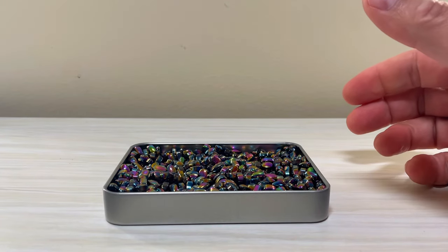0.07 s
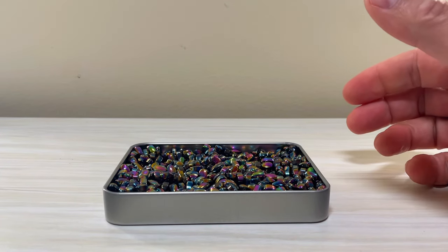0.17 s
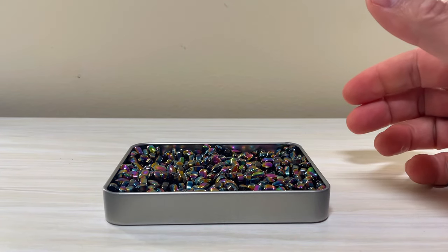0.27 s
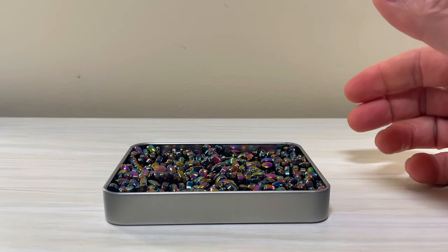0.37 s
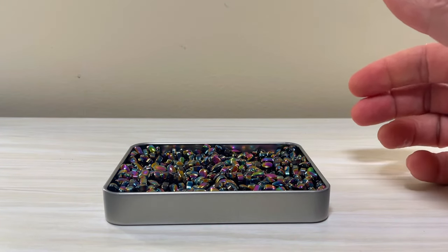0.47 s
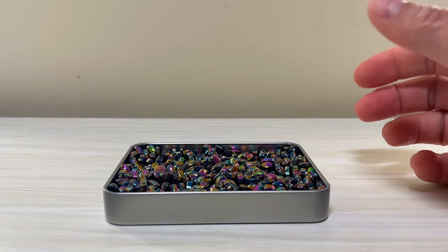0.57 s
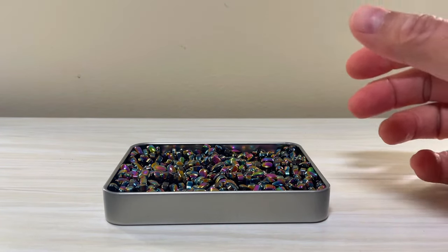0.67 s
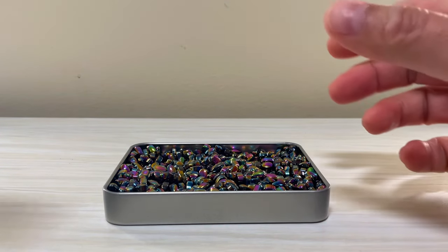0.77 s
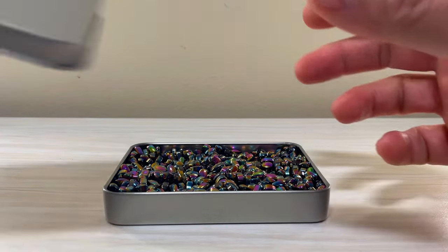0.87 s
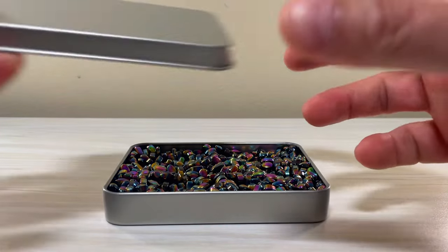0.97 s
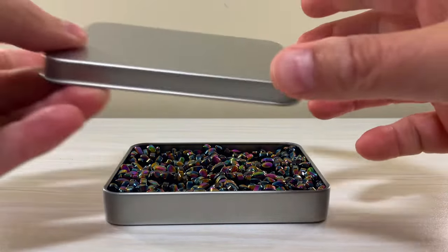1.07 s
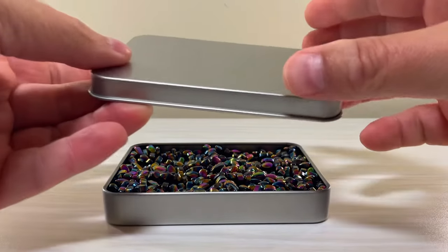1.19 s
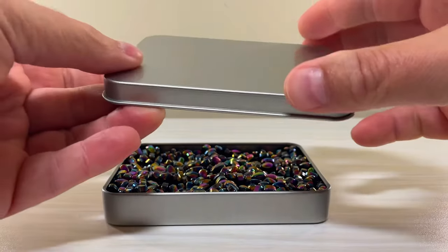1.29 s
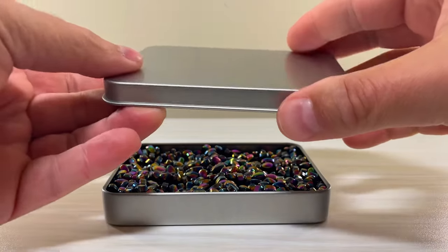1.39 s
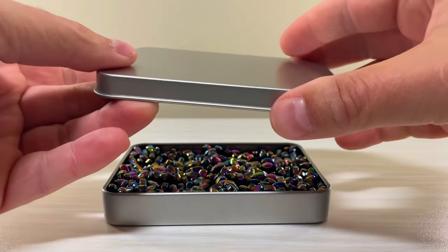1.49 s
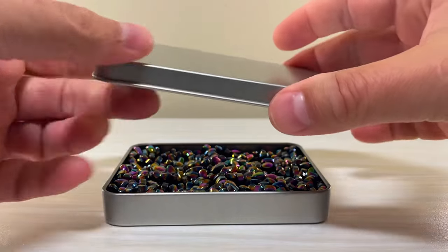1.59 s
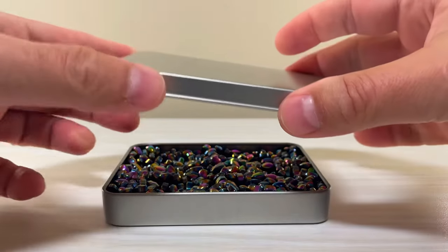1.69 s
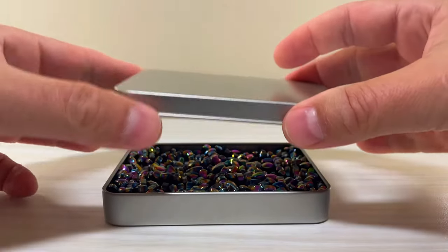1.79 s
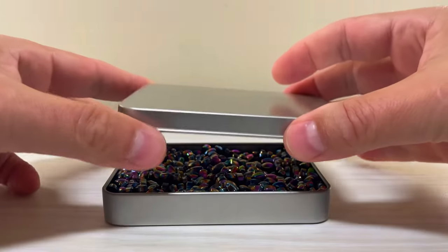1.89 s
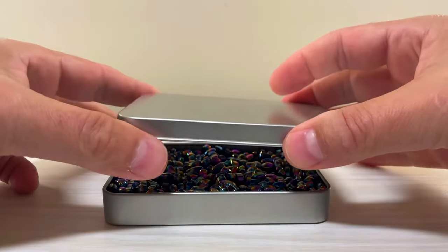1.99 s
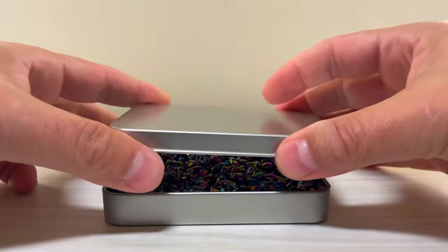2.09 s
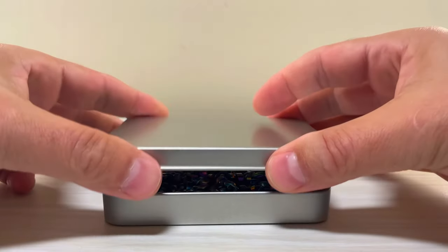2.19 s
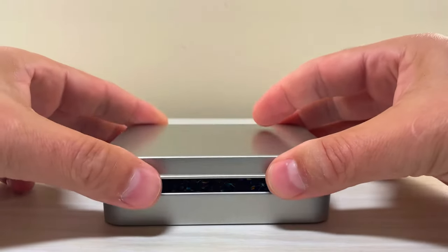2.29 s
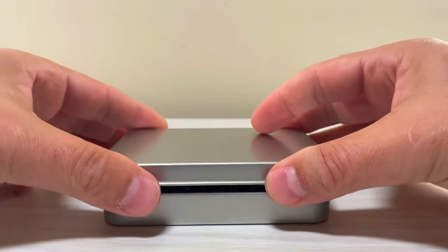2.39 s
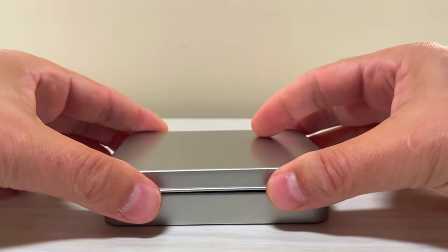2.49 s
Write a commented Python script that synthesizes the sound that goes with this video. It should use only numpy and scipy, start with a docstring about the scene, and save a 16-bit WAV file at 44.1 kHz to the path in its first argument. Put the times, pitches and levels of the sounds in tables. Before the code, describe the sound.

Loud bright clack of a light tin lid after a short slide on the tabletop, then very faint hand and sleeve rustle, and finally a softer damped metal clink as it seats; close, dry indoor pickup.

```python
"""A small tin's thin metal lid slides over a table (friction noise, resonances), fingers tick, the rim squeals.
It clacks down (noise bursts, damped modes, diffuse ring); hands and sleeves rustle (shaped noise).
It is lifted with a soft bump (modes, ring), carried with grip knocks (noise) and faint singing (narrow noise).
It lands with a dull clink on the filled tin (modes, noise, ring), then scrapes briefly (noise burst).
Throughout, a small, close room: steady rumble and hiss, a sine hum."""
import sys
import numpy as np
from scipy import signal
from scipy.fft import rfft, irfft, next_fast_len
from scipy.io import wavfile
from scipy.ndimage import map_coordinates

SR = 44100
rng = np.random.default_rng(int(sys.argv[2]) if len(sys.argv) > 2 else 0)


def log_audio(samples):
    """Write samples as a 16-bit WAV file to the path given in sys.argv[1]."""
    # one column per channel
    frames = np.atleast_2d(samples).T
    # limit to full scale, then quantise
    limited = np.clip(frames, -1, 1)
    pcm = np.round(limited * 32767).astype(np.int16)
    wavfile.write(sys.argv[1], SR, pcm)


N = 110250

CLACK_S, BUMP_S, SEAT_S = 0.2367, 0.618, 2.4121
SKID_S, SKID_DB = 0.015, -40
HUM_CENTRE_HZ = 110.5
RUB_HALF_WIDTH_HZ = 42
NOTCH_HZ, NOTCH_HALF_WIDTH_HZ = 8290, 620
TOP_HZ = 16500

# Colours: spectral shape per Hz, scaled to rms 1 in use.
# stereo correlation of noise: freq_hz, likeness (-1 to 1)
LIKENESS = [(60, .92), (200, .75), (400, 0.77), (700, -0.11), (1300, -.1), (2400, 0.74), (4400, .35),
            (8500, -.5), (14000, 0.53)]
# decay of the diffuse ring: freq_hz, t60_s
RING_T60 = [(100, .5), (400, 0.33), (900, 0.34), (2000, .3), (5000, .28), (10000, 0.21), (14000, 0.24)]
# room rumble and hiss colour: freq_hz, rel_db
FLOOR_COLOUR = [(20, -29), (40, -5), (58, 2.5), (85, -8), (150, -15), (300, -24.5), (800, -33.5),
                (1600, -35), (3000, -46), (7000, -47.5), (13000, -50.5), (15000, -75)]
# hum level: time_s, level_db
HUM_LEVEL = [(0, -73), (.9, -79), (1.15, -76), (1.28, -58), (1.48, -68.5), (1.62, -57.5), (1.8, -52.5),
             (2.1, -57.5), (2.5, -67.5)]
# lid sliding: time_s, rel_level_db
SLIDE_LEVEL = [(0.0, -47), (0.004, -46.5), (0.042, -52), (0.068, -46), (0.18, -65.5), (0.215, -82)]
# scrape colour: freq_hz, rel_db
SLIDE_COLOUR = [(59, -40), (100, -11.5), (252, -13.5), (352, -0.5), (983, -11.5), (1070, -8), (1370, -8),
                (3180, -9.5), (6910, -27.5), (7830, -59.5), (9260, -35.5), (13200, -40.5), (15000, -60.5)]
# sliding lid resonances: centre_hz, width_hz, rel_db
SLIDE_PEAKS = [(330, 16, -0.5), (1727, 95, -3), (2234, 37, -4), (2200, 93, -2.5), (2866, 32, -3),
               (3211, 88, -3), (3660, 37, -10), (4488, 230, -12)]
# brief squeals of the sliding rim: start_s, length_s, pitch_hz, level_db
SQUEALS = [(-.03, 0.096, 330, -53), (-.03, 0.078, 3220, -49), (.088, .06, 3760, -64)]
# fingers ticking on metal; last row: the seated lid's small bright scrape: start_s, level_db
TICKS = [(.096, -44), (.5425, -51.5), (0.823, -49), (1.346, -59.5), (1.4, -58.5), (2.485, -53)]
# tick and small scrape colour: freq_hz, rel_db
TICK_COLOUR = [(200, -7), (700, 1.5), (2200, -4), (3600, -0.5), (6000, -4.5), (10000, -7), (13000, -12),
               (14500, -27.5), (16000, -45.5)]
# contacts of the chattering rim and a near wall's echo: start_s, level_db, t60_s
CHATTER = [(0.2371, -6, 0.012), (0.2381, -16.5, 0.012), (0.2382, -13.5, 0.0096), (0.2486, -27, .04)]
# modes as the lid strikes the table; the lowest, 160-420 Hz, belong to table and room: pitch_hz, level_db,
# t60_s, left_right_db
CLACK_MODES = [(161.6, -42, 0.48, 3), (329, -27, .06, 5.5), (364, -31, 0.39, 8), (385, -28.5, .18, -7.5),
               (418, -28.5, .43, -1.5), (852, -28, .04, -4), (1077, -29.5, .13, -1), (1566, -34.5, .2, 9),
               (1818, -33.5, 0.26, 5), (1887, -22.5, 0.036, 0.5), (2400, -10.5, .022, 7.5),
               (2470, -27.5, .13, 8.5), (2631, -18, .055, 10), (2928, -37.5, .24, 3), (3060, -22, .05, 4.5),
               (3260, -31, 0.19, 5.5), (3416, -17.5, 0.032, 8.5), (4322, -35.5, .22, 2), (4463, -28, .11, 13),
               (4990, -33, .16, 2.5)]
# clack contact colour: freq_hz, rel_db
CLACK_CRACK = [(100, -18.5), (350, -0.5), (1200, -13), (2200, 6), (3300, 3.5), (5000, 5), (6800, -8),
               (9000, -6.5), (11500, -16), (14000, -18.5), (16000, -30.5)]
# clack early echo and ring colour: freq_hz, rel_db
CLACK_RING = [(50, -31), (100, -15), (160, -15.5), (230, -17), (380, -8.5), (520, -7.5), (800, -16.5),
              (1200, -15), (1850, -10), (2500, -9.5), (3700, -16), (4400, -10.5), (6000, -14), (7400, -21),
              (9200, -22.5), (12500, -24), (13700, -30.5), (15000, -59.5)]
# rustle of hands and sleeves: time_s, body_rel_db, treble_rel_db
RUSTLE_LEVELS = [(0.5, -80.5, -105), (0.552, -79.5, -81), (0.61, -77, -89.5), (0.616, -73, -95),
                 (0.7, -73, -87.5), (0.726, -71, -76.5), (0.992, -77, -81.5), (1.102, -83.5, -109),
                 (1.218, -78.5, -80), (1.462, -80.5, -80.5), (1.558, -70, -69), (1.748, -70, -84),
                 (1.928, -68.5, -81), (2.024, -85, -95.5), (2.172, -85, -76.5), (2.214, -101, -108),
                 (2.362, -101, -109), (2.4, -76, -106)]
# rustle body colour: freq_hz, rel_db
RUSTLE_COLOUR = [(410, -15), (700, -7.5), (1400, -6.5), (1900, -4.5), (2600, -1.5), (3500, -6), (4800, -6),
                 (7200, -7), (8000, -22), (10400, -66)]
# rustle treble colour: freq_hz, rel_db
FIZZ_COLOUR = [(5000, -21), (9000, 1.5), (10800, 2), (12800, -10.5), (13600, -13), (14500, -14)]
# low movement noise of the arms: time_s, rel_level_db
MOVEMENT_LEVEL = [(0.5, -77), (0.604, -79.5), (0.616, -67), (1.082, -77.5), (1.388, -64.5), (1.504, -74),
                  (1.902, -67), (2.32, -99), (2.4, -71)]
# movement colour: freq_hz, rel_db
MOVEMENT_COLOUR = [(90, -8), (200, -4.5), (300, 0.5), (400, -3), (560, -4.5), (800, -15.5), (1500, -26.5),
                   (4000, -36), (12000, -47), (15000, -94)]
# table and lid modes as fingers lift it: pitch_hz, level_db, t60_s, left_right_db
TABLE_MODES = [(109.4, -50.5, 0.33, 3), (163.8, -53, 0.26, 1), (313, -54, 0.083, 0), (559, -58, .1, -6),
               (1263, -65.5, 0.065, 7), (1990, -60.5, 0.17, -5), (2180, -38.5, 0.01, 1),
               (2580, -53.5, 0.073, -3), (2543, -55.5, 0.089, -3), (2720, -68, .07, 7)]
# bump ring colour: freq_hz, rel_db
BUMP_RING = [(60, -7), (140, 8), (330, -6), (600, -7), (900, -21), (1300, -7), (1800, -30), (2100, -7),
             (2650, -1.5), (2900, -30), (8000, -48), (15000, -80)]
# soft low knocks and shifts of the grip: start_s, rel_level_db
GRIPS = [(.94, -67), (1.04, -66), (1.186, -63.5), (1.39, -79)]
# grip colour: freq_hz, rel_db
GRIP_COLOUR = [(50, 13.5), (110, 2), (250, 2), (500, -9), (900, -10), (1400, -6), (2200, -11), (4000, -17),
               (8000, -26), (15000, -80)]
# held lid singing under rubbing fingers: start_s, length_s, pitch_hz, level_db
SINGING = [(.95, 1, 1598, -78.5), (2.03, 0.29, 1524, -86.5)]
# held lid modes on the tin: pitch_hz, level_db, t60_s, left_right_db
TIN_MODES = [(114, -48, 0.48, 1), (551, -54, 0.52, 0), (723, -38, 0.033, 1), (1095, -26.5, 0.038, 2.5),
             (1260, -29.5, 0.029, 2), (1463, -27.5, 0.033, -6), (1526, -39, 0.17, -2.5),
             (2167, -37, 0.038, 9), (2530, -51, 0.084, 19), (3210, -68, 0.097, 11), (4400, -52, 0.051, 6.5)]
# seating contact colour: freq_hz, rel_db
SEAT_CRACK = [(100, 6), (1000, -11), (2000, 2.5), (4000, -1.5), (6000, -6.5), (8500, -4.5), (12000, -12.5),
              (13500, -27), (16000, -33)]
# seating ring colour: freq_hz, rel_db
SEAT_RING = [(47, -30), (80, -10), (378, -13), (575, -8), (896, -9), (1020, -1.5), (1400, -8.5), (1560, -6),
             (1820, -20), (2330, -17.5), (7200, -39), (8050, -55), (9190, -30), (10700, -33),
             (16000, -73.5)]


def amp(db):
    """Decibels to gain."""
    return 10 ** (np.asarray(db) / 20)


def unit(x):
    """Scale to rms 1."""
    return x / np.sqrt(np.mean(x ** 2) + 1e-20)


def along(points, hz):
    """Interpolate (Hz, value) points on a log frequency axis."""
    point_hz, values = np.transpose(points)
    return np.interp(np.log(hz + 1), np.log(point_hz + 1), values)


def since(start_s):
    """Seconds since start_s, zero before."""
    return np.maximum(np.arange(N) / SR - start_s, 0)


def levels(rows):
    """One gain curve per dB column, fading exponentially outside the rows."""
    time_s, *columns_db = np.transpose(rows)
    t = since(0)
    outside_s = np.abs(t - np.clip(t, time_s.min(), time_s.max()))
    fade = np.exp(-outside_s / 0.035)
    return [amp(np.interp(t, time_s, db)) * fade for db in columns_db]


def wobble(rate_hz):
    """Random curve, linear between rate_hz knots a second of standard deviation 1."""
    return map_coordinates(rng.standard_normal(N), [since(0) * rate_hz], order=1)


def pan(left_right_db):
    """Left and right gains for a level difference."""
    return amp(np.array([[left_right_db], [-left_right_db]]) / 2)


def filtered(x, response):
    """Multiply the spectrum of x by a response of frequency."""
    size = next_fast_len(N + SR // 2)
    hz = np.fft.rfftfreq(size, 1 / SR)
    return irfft(rfft(x, size) * response(hz), size)[..., :N]


def noise(colour):
    """Coloured stereo noise of rms 1; mid/side balance sets the correlation, nearly mono in the bass."""
    def mid_side(hz):
        angle = np.arccos(np.clip(along(LIKENESS, hz), -1, 1)) / 2
        return amp(along(colour, hz)) * [np.cos(angle), np.sin(angle)]
    mid, side = filtered(rng.standard_normal((2, N)), mid_side)
    return unit(np.array([mid + side, mid - side]))


def strike(start_s, t60_s, attack_s):
    """Envelope of a blow: quick rise, exponential fall."""
    t = since(start_s)
    return amp(-60 * t / t60_s) * (1 - np.exp(-t / attack_s))


def modes(start_s, table, attack_s, stagger_rad):
    """Damped sines of a struck body; start phase steps by stagger_rad per mode."""
    out = 0
    for k, (hz, db, t60_s, left_right_db) in enumerate(table):
        tone = np.sin(2 * np.pi * hz * since(start_s) + k * stagger_rad)
        out = out + pan(left_right_db) * amp(db) * strike(start_s, t60_s, attack_s) * tone
    return out


def diffuse(start_s, colour, attack_s):
    """Dense ring of metal and room; each frequency dies at its own speed."""
    hz, t, spectrum = signal.stft(noise(colour), SR, nperseg=256)
    decay = amp(-60 * np.maximum(t - start_s, 0) / along(RING_T60, hz)[:, None])
    tail = signal.istft(spectrum * decay, SR, nperseg=256)[1][:, :N]
    return tail * (1 - np.exp(-since(start_s) / attack_s))


def rubbed(rows):
    """Narrow resonances driven by friction noise, each swelling and fading."""
    out = 0
    for start_s, length_s, hz, db in rows:
        def resonance(f):
            return 1 / (1 + ((f - hz) / RUB_HALF_WIDTH_HZ) ** 2)
        tone = unit(filtered(rng.standard_normal(N), resonance))
        progress = np.clip(since(start_s) / length_s, 0, 1)
        out = out + amp(db) * tone * np.sqrt(np.abs(np.sin(np.pi * progress)))
    return out


def room_tone():
    """Steady rumble and faint hiss as noise; a sine hum that swells and wanders in pitch."""
    level, = levels(HUM_LEVEL)
    phase = 2 * np.pi * np.cumsum(HUM_CENTRE_HZ + 4.5 * wobble(9)) / SR
    hum = level * amp(1.2 * wobble(34)) * np.sin(phase)
    return amp(-63.5) * noise(FLOOR_COLOUR) + pan(.9) * hum


def lid_response(hz):
    """Sum of the sliding lid's resonances, alternating in sign."""
    out = 0
    for k, (centre, width, db) in enumerate(SLIDE_PEAKS):
        damping = 1j * hz * width
        out = out + (-1) ** k * amp(db) * damping / (centre * centre - hz * hz + damping)
    return out


def slide():
    """Friction on the table excites the lid; its rim skids once more as it tips."""
    level, = levels(SLIDE_LEVEL)
    resonant = unit(filtered(noise([(100, 0.0092), (10000, 0.0024)]), lid_response))  # near-flat drive
    scrape = amp(0.5) * noise(SLIDE_COLOUR) * amp(0.94 * wobble(250)) + amp(-1.5) * resonant
    before_clack = since(CLACK_S) == 0
    skid = amp(SKID_DB) * np.clip(since(CLACK_S - SKID_S) / SKID_S, 0, 1) * before_clack
    return pan(2.2) * scrape * (level + skid)


def squeals():
    """Friction briefly drives narrow resonances of the sliding rim."""
    return pan(1.2) * rubbed(SQUEALS)


def ticks_and_small_scrape():
    """Fingertip ticks, last the seated lid's small scrape: short noise bursts with a weaker room tail."""
    direct = sum(amp(db) * strike(s, t60_s=0.0098, attack_s=.0004) for s, db in TICKS)
    room = sum(amp(db - 19.5) * strike(s, t60_s=0.35, attack_s=0.0016) for s, db in TICKS)
    return noise(TICK_COLOUR) * (direct + room)


def clack():
    """The lid slaps the table: a short chatter of the rim, the lid's modes with low table and room modes, early
    echoes and the room."""
    chatter = sum(amp(db) * strike(s, t60_s, attack_s=0.00072) for s, db, t60_s in CHATTER)
    crack = pan(0.83) * noise(CLACK_CRACK) * chatter
    early = amp(-18) * noise(CLACK_RING) * strike(CLACK_S, t60_s=0.12, attack_s=0.0018)
    room = amp(-23.5) * diffuse(CLACK_S, CLACK_RING, attack_s=0.0069)
    ring = modes(CLACK_S, CLACK_MODES, attack_s=.0003, stagger_rad=np.pi)
    return ring + crack + pan(1.2) * (early + room)


def handling():
    """Skin and cloth rustle as fluttering noise; the arms add low movement noise."""
    body, treble = levels(RUSTLE_LEVELS)
    low, = levels(MOVEMENT_LEVEL)
    rustle = amp(1.5) * body * noise(RUSTLE_COLOUR) + amp(4.5) * treble * noise(FIZZ_COLOUR)
    flutter = amp(1.26 * wobble(180))
    movement = amp(0.87) * low * noise(MOVEMENT_COLOUR)
    return pan(1.0) * (rustle * flutter + movement)


def bump():
    """Fingers pick the lid up with a soft knock: table and lid modes plus a diffuse ring."""
    knock = modes(BUMP_S, TABLE_MODES, attack_s=0.00041, stagger_rad=np.pi)
    return knock + amp(-57) * diffuse(BUMP_S, BUMP_RING, attack_s=0.0025)


def grips():
    """The hands shift their hold on the lid: soft decaying noise knocks."""
    knocks = sum(amp(db + 8.5) * strike(s, t60_s=0.22, attack_s=.012) for s, db in GRIPS)
    return noise(GRIP_COLOUR) * knocks


def singing():
    """Fingers rubbing the held lid make one mode sing faintly."""
    return rubbed(SINGING)


def seat():
    """The held lid meets the rim of the filled tin and is quickly damped."""
    crack = amp(-33.5) * noise(SEAT_CRACK) * strike(SEAT_S - .0004, t60_s=.022, attack_s=0.00043)
    room = amp(-41) * diffuse(SEAT_S, SEAT_RING, attack_s=0.011)
    ring = modes(SEAT_S, TIN_MODES, attack_s=0.00074, stagger_rad=-np.pi / 2)
    return ring + pan(1.5) * (crack + room)


def scene():
    """All sources, left and right."""
    friction = slide() + squeals() + singing()
    contacts = ticks_and_small_scrape() + clack() + bump() + grips() + seat()
    return room_tone() + friction + contacts + handling()


def record(dry):
    """Treble notch, rounded peaks, upper band limit."""
    edges_hz = [NOTCH_HZ - NOTCH_HALF_WIDTH_HZ, NOTCH_HZ + NOTCH_HALF_WIDTH_HZ]
    notch = signal.butter(4, edges_hz, "bandstop", fs=SR, output="sos")
    notched = signal.sosfilt(notch, dry)
    rounded = notched / (1 + np.abs(notched / .9) ** 6) ** (1 / 6)
    return filtered(rounded, lambda hz: hz < TOP_HZ)


dry = scene()
out = record(dry)
log_audio(out)
```